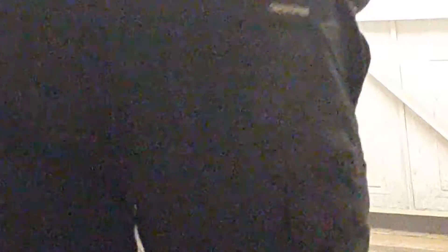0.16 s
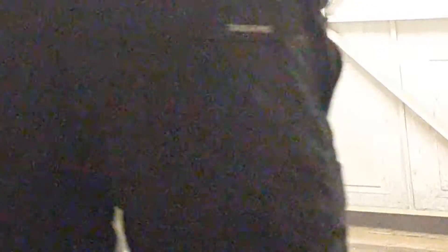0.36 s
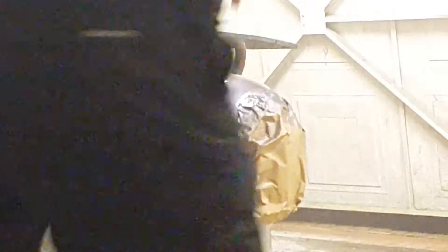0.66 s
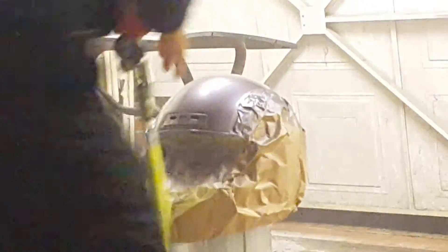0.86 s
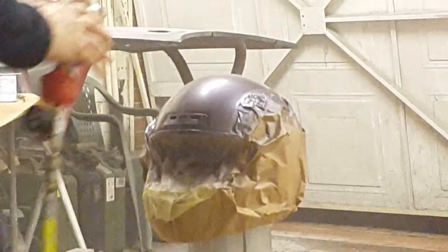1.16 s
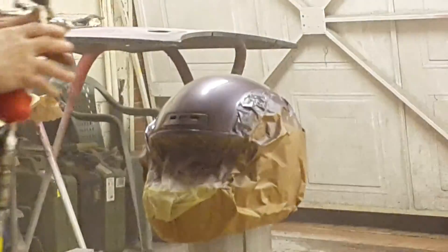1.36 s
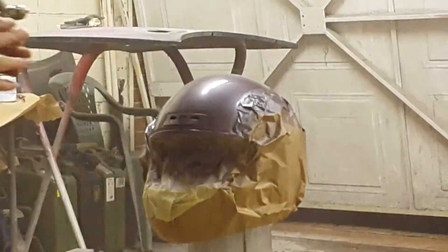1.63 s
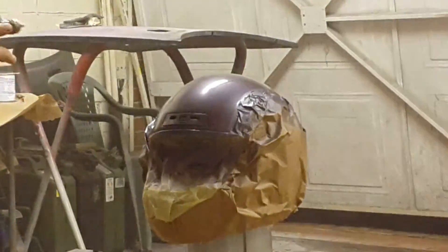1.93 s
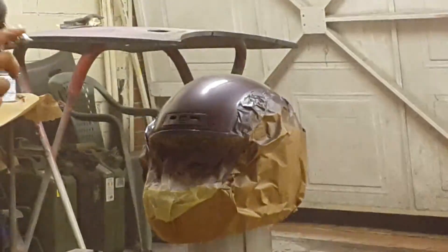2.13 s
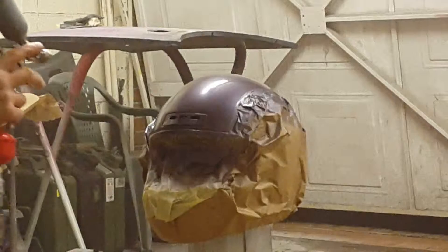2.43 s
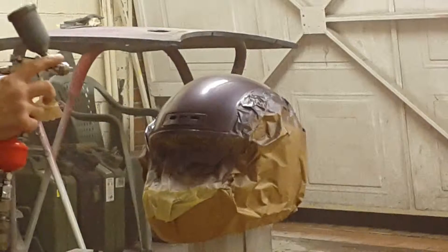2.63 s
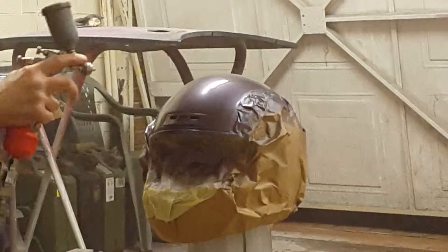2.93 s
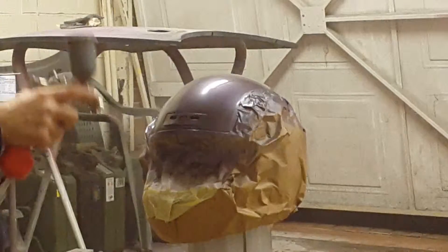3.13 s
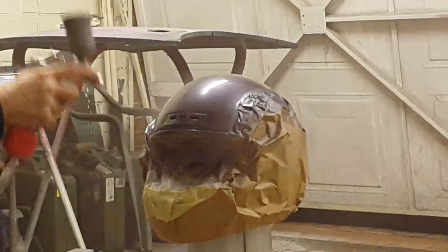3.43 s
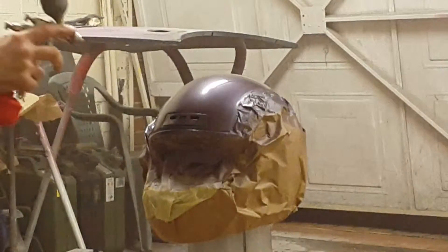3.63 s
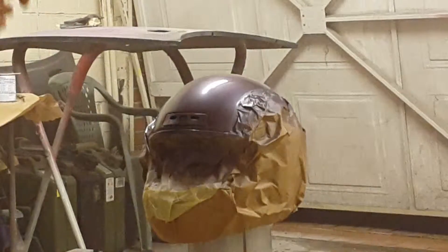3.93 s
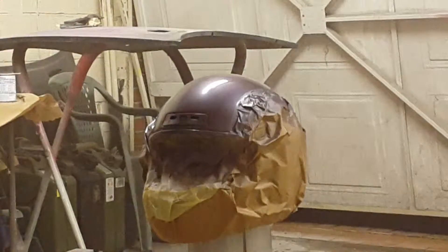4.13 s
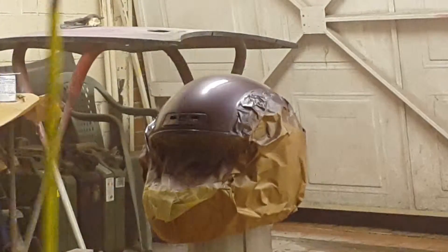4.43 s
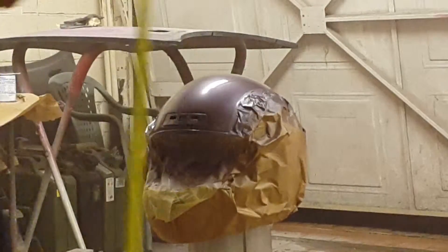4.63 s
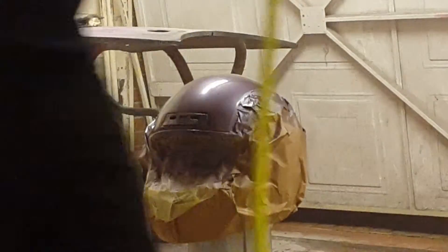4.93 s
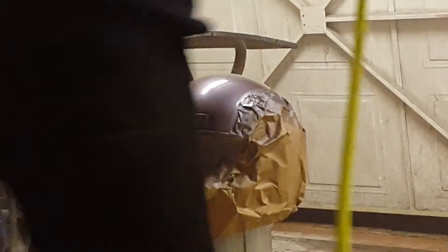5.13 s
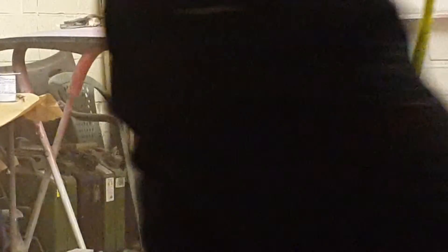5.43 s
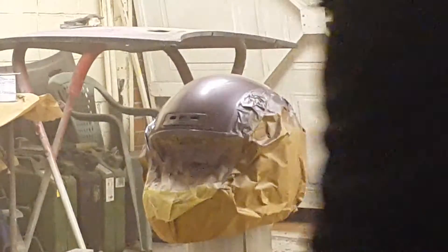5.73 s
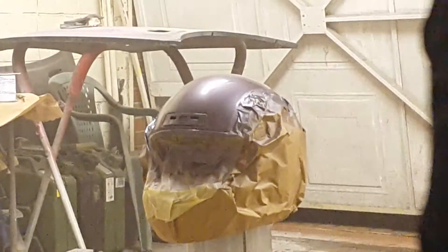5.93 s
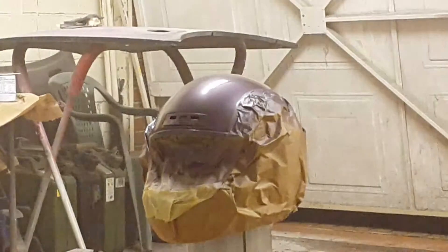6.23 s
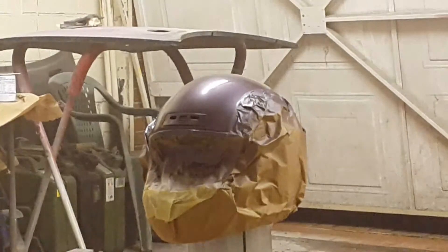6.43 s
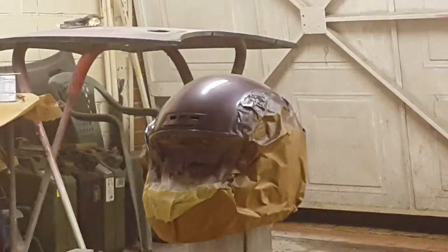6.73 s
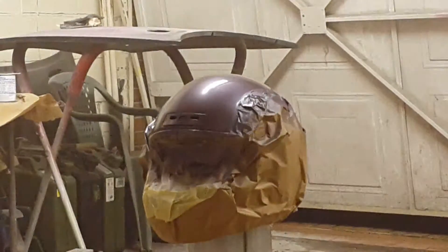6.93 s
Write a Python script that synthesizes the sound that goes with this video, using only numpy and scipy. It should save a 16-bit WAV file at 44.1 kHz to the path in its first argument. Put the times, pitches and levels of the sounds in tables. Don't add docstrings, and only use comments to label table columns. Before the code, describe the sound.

Loud, low mechanical throbbing with intake roar and valve clatter fills a hard garage, then drops away suddenly as the motor stops. A puff of venting air runs straight into two quick spray gun bursts. Afterward it is much quieter: piercing but small air whistles sag and flutter, breathy air seeps, soft knocks land, and a small fan motor and mains hum remain. Stereo camera microphone, near the work.

```python
import sys
import numpy as np
from scipy import signal
from scipy.fft import rfft, irfft
from scipy.io import wavfile
from scipy.ndimage import uniform_filter1d

SR = 44100
rng = np.random.default_rng(int(sys.argv[2]) if len(sys.argv) > 2 else 0)


def wav_out(sig):
    wavfile.write(sys.argv[1], SR, np.round(np.clip(np.atleast_2d(sig).T, -1, 1) * 32767).astype(np.int16))


def volts(x):
    e = np.asarray(x, float) / 20
    return 10 ** e


N = 311346

# t/s, level/dB
EFFORT = [(0.0, -11), (.19, -10), (.52, -11), (.545, -9), (.62, -11), (.9, -10), (1.13, -11), (1.38, -9.5),
          (1.5, -11.5), (1.75, -9.5), (2.2, -10), (2.5, -9), (2.62, -9), (2.716, -12)]
# t/s, share of full speed
RUN_DOWN = [
    (2.716, 1),
    (2.742, .69),
    (2.8, .655),
    (2.83, .56),
    (2.87, .45),
    (3.17, .22),
]
# multiple of the stroke rate, level/dB
STROKE = [(1, -34), (2, -29.5), (3, -10.5), (4, -4), (5, 0), (6, -8.5), (7, -13.5), (8, -10.5), (9, -23),
          (10, -6), (11, 0.5), (12, -1), (13, -34), (14, -16.5), (15, -13.5), (16, -8), (17, -23),
          (18, -20), (19, -18.5), (20, -19.5), (21, -20.5), (22, -59), (23, -22), (24, -31), (25, -23),
          (26, -35.5), (27, -22.5), (28, -20.5)]
# f/Hz, width/Hz, level/dB
CASING_RINGS = [(1581, 83, -31), (1740, 79, -27), (2000, 94, -34), (2139, 26, -31), (2685, 1300, -44)]
# f/Hz, level/dB (per Hz)
INTAKE = [(35, -72), (60, -47), (91, -23), (230, -9), (292, -8.5), (433, -3.5), (535, -10), (652, -7.5),
          (774, -11.5), (848, -14), (1400, -24), (1820, -58), (3080, -120)]
# f/Hz, level/dB (per Hz)
VALVES = [(760, -37), (1300, -2), (1360, -18), (1440, -8.5), (1740, -9.5), (1900, -9), (2200, -10.5),
          (2320, -13.5), (2830, -11.5), (4350, -20), (5660, -18.5), (9270, -27.5), (9660, -26.5),
          (11900, -32.5), (16000, -43)]

# multiple of the fan speed, level/dB
FAN = [(5, -17), (6, -10.5), (7, -0.5), (8, -18), (9, -6.5), (10, -11), (11, -4.5), (12, -6.5), (13, -2),
       (14, -14), (15, -6), (16, -4), (17, -5), (18, -8.5), (19, -9), (20, -22), (21, -24), (22, -21),
       (23, -24), (24, -12), (25, -14.5), (26, -30), (27, -32), (28, -26), (29, -27), (30, -17)]
# f/Hz, width/Hz, level/dB
FAN_RINGS = [(1150, 57, -13), (1287, 70, -11), (1970, 320, -19)]
# multiple of the hum pitch, level/dB
HUM = [(1, -43.5), (2, -53.5)]
# f/Hz, level/dB (per Hz)
RUMBLE = [(24, -54.5), (40, -32), (68, -17.5), (97, -6), (150, -9.5), (250, -6.5), (355, -5.5), (452, 0),
          (608, -7), (1000, -18), (1300, -40), (2200, -120)]
# f/Hz, level/dB (per Hz)
AIR = [(590, -36), (1000, -6), (1290, -5), (1650, -12), (2030, -8), (2250, -13), (3010, -19.5), (3380, -26),
       (4360, -29.5), (4840, -27), (8650, -33), (10300, -33.5), (12500, -30), (16000, -37)]

# start t/s, length t/s, first f/Hz, last f/Hz, top level/dB
PUFFS = [(1.86, .07, 15500, 13400, -48), (1.92, .08, 14300, 14700, -47.5), (3.82, .1, 14400, 15350, -31),
         (3.9, .1, 15250, 15000, -30), (3.93, .025, 13500, 14700, -31), (3.97, .02, 14460, 13200, -30),
         (5.12, 0.14, 14140, 14620, -24.5), (5.25, 0.098, 14360, 14200, -31), (6.7, .22, 13400, 12900, -70),
         (6.988, .022, 10800, 10500, -52), (6.995, .025, 10400, 8200, -61), (7.015, .06, 10900, 10700, -60),
         (7.03, .05, 5400, 5400, -61)]
# start t/s, length t/s, first f/Hz, last f/Hz, top level/dB
GASPS = [
    (1.24, .16, 15200, 14600, -47),
    (2.54, .2, 15500, 14700, -54),
    (6.27, .13, 14800, 14300, -48),
    (6.36, .24, 13400, 13400, -57),
]
# start t/s, length t/s, first f/Hz, last f/Hz, top level/dB
RUSTLE = (6.97, 0.5, 13500, 13500, -55)

# t/s, level/dB
VENT = [
    (2.676, -29),
    (2.688, -23.5),
    (2.786, -17.5),
    (2.96, -19.5),
    (3.06, -23),
    (3.158, -29.5),
    (3.18, -38),
]
# f/Hz, level/dB (per Hz)
VENT_TONE = [(410, -22), (700, -6.5), (1140, -5.5), (1460, -14.5), (1640, -9), (2240, -8.5), (2880, -1),
             (3740, -6.5), (4430, -4.5), (5500, -3.5), (7200, -4.5), (9350, -8.5), (12000, -8),
             (16000, -15)]

# start t/s, held t/s, flow level/dB, draught build t/s, buffeting level/dB
PULLS = [
    (3.168, 0.18, -25, 0.11, -25),
    (3.459, 0.17, -25.5, 0.017, -25),
]
# f/Hz, level/dB (per Hz)
JET = [(590, -45), (1000, -7.5), (1200, -17), (1430, -12.5), (2080, -8.5), (2550, -8), (3050, -1.5),
       (3500, -7), (4200, -7), (7440, -3.5), (8750, -5), (15100, 0.5), (16000, -20.5)]
# f/Hz, width/Hz, level/dB
BUFFET = [(308, 160, -2), (395, 54, -7.5), (609, 200, -2.5), (817, 240, -10.5), (1234, 200, -12)]

# t/s, f/Hz
LEAK = [
    [(3.38, 15234), (3.634, 14888), (3.7, 14820), (3.8, 14745), (3.902, 15260), (3.93, 15167)],
    [(3.945, 14770), (4.043, 14764), (4.167, 14514), (4.443, 14465), (4.643, 14668), (4.85, 14440),
     (5.05, 14170), (5.14, 14105)],
    [(5.295, 13800), (5.437, 14116), (5.503, 14015), (5.865, 13845), (5.99, 13850)],
    [(5.94, 14615), (6.114, 14828), (6.232, 14366), (6.326, 14685), (6.362, 13762), (6.424, 13075),
     (6.53, 13246)],
]
# first level/dB, slope in dB per s
LEAK_DB = [
    (-33.5, 8),
    (-26, -0.4),
    (-32.5, -19.5),
    (-42, -21),
]
# t/s, half length t/s, level/dB
SURGES = [(3.4, .08, -4), (3.627, .04, 5), (3.68, .02, -6), (3.736, 0.027, 6), (3.99, .016, -7),
          (4.034, .004, -8), (4.062, .014, 5), (4.088, .008, -5), (4.114, .008, 3), (4.17, .005, -4),
          (4.226, .008, -9), (4.258, .025, 5), (4.29, .01, 4), (4.325, .01, 10), (4.36, .022, -9),
          (4.41, 0.012, -15), (4.495, 0.0037, -8), (4.56, 0.025, 6), (4.585, .01, 4), (4.602, .006, -9),
          (4.618, .005, -8), (4.703, .005, -2), (4.774, 0.0072, -14), (4.83, .006, -6), (4.848, .008, 4),
          (4.87, .008, -11), (4.938, .006, 1), (4.96, .005, -11), (5.101, .01, -7), (5.12, .008, 2),
          (5.885, 0.014, 8), (6.23, 0.047, 7), (6.355, .025, -12), (6.43, 0.036, 5)]

# t/s, lowest cavity tone f/Hz, flow level/dB
SEEP = [
    (3.8, 4880, -48),
    (3.92, 5090, -53),
    (4.2, 4870, -50.5),
    (4.64, 4930, -51),
    (4.76, 5080, -47.5),
    (5.04, 4970, -44.5),
    (5.14, 4960, -41),
    (5.28, 4860, -61.5),
    (5.36, 4870, -72),
]

# t/s, peak level/dB, left-right level/dB
KNOCKS = [
    (4.189, -42, -3),
    (4.9252, -37.5, -1),
    (5.56, -52, 1.5),
    (5.7294, -47, 1.5),
    (5.7616, -33, -3),
    (5.766, -34, -2),
    (6.282, -46, 0.5),
    (6.5294, -50, 4),
]
# f/Hz, level/dB, t60 t/s
KNOCK = [(550, 6, .08), (906, 5, 0.17), (1970, 9, 0.07), (2910, 4.5, 0.033), (4870, -13, 0.029)]

# t/s, f/Hz
THIN_HIGH = [(5.23, 11760), (5.304, 11290), (5.358, 10060), (5.472, 9668), (5.784, 9637), (5.98, 10060),
             (6.128, 12390), (6.22, 12540)]
# t/s, f/Hz
THIN_MID = [(5.23, 7571), (5.472, 8022), (5.774, 8184), (5.936, 7667), (6.33, 7400)]
# first level/dB, slope in dB per s, swell t/s, swell level/dB
THIN_DB = [
    (-61, -7, 5.78, 5),
    (-69, 0.5, 5.75, 4),
]
# start t/s, length t/s, first f/Hz, last f/Hz, top level/dB
GLIDES = [(5.4, .48, 3970, 4090, -71), (6.69, 0.2, 4540, 4220, -63), (6.82, .19, 4220, 4380, -61),
          (6.74, .24, 4250, 4500, -63), (5.9, .4, 9600, 9350, -73), (6.7, .13, 9034, 8900, -67),
          (6.75, .17, 8650, 8500, -73), (6.98, .09, 8150, 8000, -65)]

# f/Hz, level/dB
SIDE_FAR = [(60, -29.5), (130, -51), (290, -23.5), (640, -19.5), (1410, -4), (3100, -9.5), (6820, -7.5),
            (15000, -10)]
# f/Hz, level/dB
SIDE_NEAR = [(60, 0), (130, -9), (290, -28.5), (640, -15), (1410, -4.5), (3100, -14), (6820, -6.5),
             (15000, -10.5)]
# f/Hz, level/dB
LEAN_FAR = [(60, -0.51), (180, 0.16), (550, -0.047), (1650, -0.9), (4970, 0.46), (15000, 1.0)]
# f/Hz, level/dB
LEAN_NEAR = [(60, 0.0), (180, 9), (550, -5), (1650, 0.019), (4970, 0), (15000, 3.5)]

STROKE_HZ, FAN_HZ, HUM_HZ, TOP_HZ = 48.7, 36.15, 99.9, 15950
STOP_S = 3.17
CLATTER_DB, COAST_CLATTER_DB = -27, 10.5
COAST_HOLD_S, COAST_DB_PER_S = 0.084, -120
LINGER_DB, LINGER_DB_PER_S = -5.5, -130
CHOKE_TURN, CHOKE_DEPTH, CHOKE_TURNS = .46, 0.54, 0.17
FAN_DB, RUMBLE_DB, AIR_DB = -35.5, -36.5, -48
DUCK_DB, DUCK_ENDS_S, DUCK_OPENS_S = -8.5, 2.75, 0.29
PUFF_HZ, GASP_HZ, RUSTLE_HZ = 300, 900, 4000
GLIDE_ENDS_DB, PUFF_ENDS_DB = -3, -8
VENT_TREBLE_DB, VENT_DULL_DB_PER_S2 = -3.5, -10
PULL_S, TAIL_S = 0.0091, .49
RELEASE_DB_PER_S, RELEASE_FLOOR_S = -125, 0.11
DULL_SHARE, SPIT_DB, SPIT_S = 0.49, 2.5, 0.034
LAG_DB, BUFFET_DB_PER_S, BUFFET_HOLD_S = -9, -110, 0.084
SEEP_REST_DB, SPREAD, SPREAD_PER_DB = -47, 0.39, 0.5
SEEP_MID_DB, SEEP_MID_SHARE = -47, 0.3
SEEP_MID_FROM_S, SEEP_MID_RISE_S = 3.82, 0.3
SEEP_HIGH_DB, SEEP_HIGH_SHARE, SEEP_HIGH_RATIO = -52.5, 0.22, .664


def evened(x):
    return x / np.sqrt(np.mean(abs(x) ** 2) + 1e-20)


def read(points, hz):
    f, value = np.transpose(points)
    return np.interp(np.log(hz + 1), np.log(f + 1), value)


def played(rows):
    s, *columns = np.transpose(rows)
    t = np.arange(max(s[0], 0), s[-1], 1 / SR)
    return [t] + [np.interp(t, s, c) for c in columns]


def swell(start, length, first_hz, last_hz, db, ends_db):
    t = np.arange(start, min(start + length, N / SR), 1 / SR)
    u = (t - start) / length
    return t, first_hz + (last_hz - first_hz) * u, db + ends_db * (1 - np.sin(np.pi * u ** 0.55))


def add(mix, t, sound, fade_s=.004, end_s=0.0077):
    part = mix[:, round(t[0] * SR):][:, :len(t)]
    rise = (t - t[0] + (t[0] < .01)) / fade_s
    fall = (t[-1] - t + (t[-1] > 7.05)) / end_s
    soft = np.clip(np.minimum(rise, fall), 0, 1)
    part += (sound * soft)[:, :part.shape[1]]


def drift(count, hz, size):
    z = rng.standard_normal((count, size // 32 + 400, 2)) @ [1, 1j]
    r = np.exp(-2 * np.pi * hz * 32 / SR)
    z = signal.lfilter([1], [1, -r], signal.lfilter([1], [1, -r], z))[:, 398:]
    return evened(signal.resample_poly(z, 32, 1, axis=1)[:, :size])


def ports(x, side, lean):
    hz = np.fft.rfftfreq(x.shape[1], 1 / SR)
    mid, rim = rfft(x[0]), rfft(x[1]) * volts(read(side, hz))
    left_right = np.array([mid + rim, mid - rim])
    return irfft(left_right * volts(read(lean, hz) / [[2], [-2]]), x.shape[1])


def hiss(tone, size, patchy_db, band_hz, side=SIDE_NEAR, lean=LEAN_NEAR):
    hz = np.fft.rfftfreq(512, 1 / SR)
    a, b, c, d, patch = rng.standard_normal((size // 128 + 6, 257, 5)).T
    patch = evened(uniform_filter1d(uniform_filter1d(patch, 6, 0), 20, 1))
    gain = volts(read(tone, hz))
    inside = (hz > band_hz[0]) & (hz < band_hz[1])
    share = np.sqrt(np.sum(gain[inside] ** 2) / np.sum(gain ** 2))
    spectrum = np.array([a + 1j * b, c + 1j * d]) * (gain[:, None] * volts(patchy_db * patch))
    x = signal.istft(spectrum, nperseg=512, noverlap=384)[1]
    return ports(evened(x[:, :size]), side, lean) / share


def long_hiss(tone, size):
    z = rfft(rng.standard_normal((2, size))) * volts(read(tone, np.fft.rfftfreq(size, 1 / SR)))
    return ports(evened(irfft(z, size)), SIDE_FAR, LEAN_FAR)


def treble(x, db, edge_hz=8500):
    high = signal.sosfiltfilt(signal.butter(2, edge_hz, "high", fs=SR, output="sos"), x)
    return x + (volts(db) - 1) * high


def whistle(t, hz, db, width_hz, unsteady, apart=0.73, pan_db=3.0):
    a, b, c = drift(3, width_hz, len(t))
    flutter = (1 - unsteady) + unsteady * np.array([a + apart * b, a + apart * c])
    tone = (flutter * np.exp(2j * np.pi * np.cumsum(hz) / SR)).real
    return volts(db) * evened(tone) * volts(pan_db * np.array([[.5], [-.5]]))


def band(t, hz, db, width_hz, order=3):
    turn = np.exp(2j * np.pi * np.cumsum(hz + 0 * t) / SR)
    a, b = rng.standard_normal((2, len(t) + 800, 2)) @ [1, 1j]
    lowpass = signal.butter(order, np.mean(width_hz) / 2, fs=SR, output="sos")
    low = signal.sosfilt(lowpass, [a + 0.64 * b, a - 0.12 * b])
    return volts(db) * evened((low[:, 800:] * turn).real)


def rotor(hz, orders, rings, count, wander, wander_hz, carried, scatter, bass_hz=260, ragged=2.1):
    k, db = np.transpose(orders)
    turns = np.cumsum(hz) / SR + .84
    slow = drift(2 * count, wander_hz, len(hz[::8]))
    rough = ragged * (1 - hz[::8] / hz[0]) * drift(2 * count, 16.0, len(hz[::8]))
    grid = np.arange(0, count + 1, .1)
    ringing = sum(volts(level) / (1 + (2 * (grid * hz[0] - f) / width) ** 2) for f, width, level in rings)
    casing = np.interp(grid, k, volts(db), left=0, right=0) + ringing * (grid > k[-1])
    out = np.zeros((2, len(hz)))
    for n in range(1, count + 1):
        own = casing[10 * n]
        radiated = (1 + (bass_hz / (n * hz[0])) ** 4) / (1 + (bass_hz / (n * hz)) ** 4)
        level = carried * radiated * own + (1 - carried) * np.interp(n * hz / hz[0], grid, casing)
        weak = min(wander * (casing.max() / (own + 1e-6)) ** (2 / 5), 1)
        pair = slice(2 * n - 2, 2 * n)
        waver = [[1], [0]] + [[weak], [1]] * slow[pair] + rough[pair]
        smear = n ** 2 * 3 / 14
        spin = np.exp(2j * np.pi * (n * turns + smear + scatter * n ** 2 * rng.random()))
        out += level * (np.repeat(waver, 8, axis=1)[:, :len(hz)] * spin).real
    return ports(out / np.std(out[:, :2 * SR], axis=1, keepdims=True), SIDE_FAR, LEAN_FAR), turns


def compressor(mix):
    t = np.arange(0, STOP_S, 1 / SR)
    off = np.maximum(t - EFFORT[-1][0], 0)
    speed = uniform_filter1d(np.interp(t, *np.transpose(RUN_DOWN)), 300)
    effort_db = np.interp(t, *np.transpose(EFFORT)) + COAST_DB_PER_S * np.maximum(off - COAST_HOLD_S, 0)
    clatter_db = effort_db + CLATTER_DB + COAST_CLATTER_DB * (1 - speed) * 2
    drone, turns = rotor(STROKE_HZ * speed, STROKE, CASING_RINGS, count=70, wander=.15, wander_hz=5.5,
                         carried=.75, scatter=.0005)
    choke = uniform_filter1d(CHOKE_DEPTH * np.exp(-((turns - CHOKE_TURN) % 1) / CHOKE_TURNS), 40)
    above_bass = signal.butter(4, 135, "high", fs=SR, output="sos")
    drone = drone - signal.sosfiltfilt(above_bass, drone * (choke - choke.mean()))
    beat = evened(1 + 0.096 * np.cos(2 * np.pi * turns - 1.6) + 0.057 * drift(1, 14, len(t))[0].real)
    roar = volts(-12.5) * long_hiss(INTAKE, len(t)) * evened(1 - choke)
    roar = roar / np.clip(speed, .4, 1) ** 1.87
    earlier = np.roll(drone, round(24 * SR / STROKE_HZ), axis=1)
    drone = drone + earlier * np.minimum(off / .02, 1) * volts(LINGER_DB + LINGER_DB_PER_S * off)
    clatter = long_hiss(VALVES, len(t)) * beat
    add(mix, t, volts(effort_db + 0.17) * (drone + roar) + volts(clatter_db + 3.0) * clatter)


def garage():
    t = np.arange(N) / SR
    fan = rotor(FAN_HZ + np.zeros(N), FAN, FAN_RINGS, count=60, wander=0.4, wander_hz=5.2,
                carried=1, scatter=.01)[0]
    hum_turns = HUM_HZ * np.arange(N) / SR + 0.49
    hum = sum(np.sqrt(2) * volts(db) * np.sin(2 * np.pi * k * hum_turns) for k, db in HUM)
    rumble = volts(RUMBLE_DB - 3.5) * long_hiss(RUMBLE, N)
    air = rumble + volts(AIR_DB - 2.0) * hiss(AIR, N, 1.6, (1000, 12000), SIDE_FAR, LEAN_FAR)
    grain = evened(1 + 0.17 * np.cos(2 * np.pi * FAN_HZ * t) + 0.16 * drift(1, 70, N).real)
    duck_db = DUCK_DB * np.clip(1 - (t - DUCK_ENDS_S) / DUCK_OPENS_S, 0, 1)
    return volts(duck_db) * (volts(FAN_DB - 7.5) * fan + hum + air * grain)


def breaths(mix):
    for rows, width_hz in [(PUFFS, PUFF_HZ), (GASPS, GASP_HZ), ([RUSTLE], RUSTLE_HZ)]:
        for row in rows:
            t, hz, db = swell(*row, PUFF_ENDS_DB)
            add(mix, t, band(t, hz, db, width_hz), fade_s=0.011)


def vent(mix):
    t, flow_db = played(VENT)
    jet = hiss(VENT_TONE, len(t), 1.05, (2000, 8000))
    jet = treble(jet, VENT_TREBLE_DB + VENT_DULL_DB_PER_S2 * (t - t[0]) ** 2)
    add(mix, t, volts(flow_db) * jet, fade_s=0.0059)


def gun(mix):
    for start, held, flow_db, build_s, buffet_db in PULLS:
        u = np.arange(0, TAIL_S, 1 / SR)
        t, gone = start + u, np.maximum(u - held, 0)
        late = np.maximum(gone - RELEASE_FLOOR_S, 0)
        fall_db = RELEASE_DB_PER_S * (np.minimum(gone, RELEASE_FLOOR_S) + 0.7 * late)
        first_spit = np.exp(-u / SPIT_S) * build_s / 0.087
        late_spit = np.minimum(u / held, 1) ** 2 * (1 - build_s / .1)
        spit_db = SPIT_DB * (first_spit + late_spit)
        jet = treble(hiss(JET, len(t), 1.4, (2000, 8000)), spit_db + DULL_SHARE * fall_db - 2.5)
        draught = sum(band(t, hz, db, width) for hz, width, db in BUFFET)
        draught = evened(0.46 * draught[0] + 0.2 * draught)
        gust_db = buffet_db + LAG_DB * np.maximum(1 - u / build_s, 0)
        gust_db = gust_db + BUFFET_DB_PER_S * np.maximum(u - build_s - BUFFET_HOLD_S, 0)
        add(mix, t, volts(flow_db + fall_db) * jet + volts(gust_db) * draught, fade_s=PULL_S, end_s=0.066)


def leaks(mix):
    for rows, (first_db, slope) in zip(LEAK, LEAK_DB):
        t, hz = played(rows)
        surge_db = sum(d * np.exp(-((t - s) / w) ** 2) for s, w, d in SURGES)
        db = first_db + slope * (t - t[0]) + surge_db
        skirt = band(t, hz, uniform_filter1d(db, 4000) - 19, 1200)
        shaky_hz = hz + 25 * drift(1, 30, len(t))[0].real
        add(mix, t, whistle(t, shaky_hz, db + 1.0, 50, 0.38, pan_db=2.5) + skirt, fade_s=0.0038)


def seep(mix):
    t, hz, flow_db = played(SEEP)
    extra_db = flow_db - SEEP_REST_DB
    spread = SPREAD + SPREAD_PER_DB * np.maximum(extra_db, 0)
    spread = np.clip(uniform_filter1d(spread, 6000), 0, .6)
    asleep = np.clip(1 - (t - SEEP_MID_FROM_S) / SEEP_MID_RISE_S, 0, 1)
    mid_db = SEEP_MID_DB + np.minimum(SEEP_MID_SHARE * extra_db, 1.2 * extra_db + 3) - 16 * asleep
    high_db = SEEP_HIGH_DB + np.minimum(SEEP_HIGH_SHARE * extra_db, 1.0 * extra_db + 5)
    leak_hz = np.interp(t, *np.transpose(LEAK[0] + LEAK[1]))
    high_hz = SEEP_HIGH_RATIO * uniform_filter1d(leak_hz, 4000)
    tones = [(hz, flow_db - 1.2, 220, 1.1, 1800),
             (1.467 * hz, mid_db, 750, 1.6, 2700),
             (high_hz, high_db, 220, 1.93, 1800)]
    for tone_hz, db, tight_hz, drag, wide_hz in tones:
        gusts_db = 2.5 * drift(2, 6.5, len(t)).real
        tight = band(t, tone_hz, db + gusts_db[0], tight_hz)
        smeared = band(t, drag * hz, db + .5 * gusts_db[1], wide_hz, order=2)
        add(mix, t, (1 - spread) * tight + spread * smeared, fade_s=0.036)
    fizz = band(t, 11600, uniform_filter1d(high_db, 9000) - 8.5, 2200)
    add(mix, t, fizz, fade_s=.1)


def knocks(mix):
    t = np.arange(9000) / SR
    for s, db, pan_db in KNOCKS:
        ring = band(t, 1600, 12, 2600) * volts(-60 * t / 0.013)
        for hz, level, t60 in KNOCK:
            decay = volts(-60 * t / t60) + volts(-12.0 - 60 * t / 0.7)
            ring = ring + band(t, hz, level, 530) * decay
        add(mix, s + t, volts(db - 16.5) * ring * volts(pan_db * np.array([[.5], [-.5]])), fade_s=.0006)


def faint_whistles(mix):
    faint = [swell(*row, GLIDE_ENDS_DB) for row in GLIDES]
    for rows, (first_db, slope, s, swell_db) in zip([THIN_HIGH, THIN_MID], THIN_DB):
        t, hz = played(rows)
        db = first_db + slope * (t - t[0]) + swell_db * np.exp(-((t - s) / .12) ** 2)
        faint.append((t, hz, db))
    for t, hz, db in faint:
        add(mix, t, whistle(t, hz, db + .5, 40, .75) + band(t, hz * .99, db - 5, 300), fade_s=.02)


def scene():
    mix = garage()
    for source in (compressor, breaths, vent, gun, leaks, seep, knocks, faint_whistles):
        source(mix)
    return mix


def roll_off(x):
    return signal.sosfilt(signal.butter(12, 16560, fs=SR, output="sos"), x)


def record(dry):
    knee = 0.94
    over = np.maximum(abs(dry) - knee, 0)
    clipped = dry - np.sign(dry) * (over - (1 - knee) * np.tanh(over / (1 - knee)))
    lowpass = signal.firwin(301, TOP_HZ, window=("kaiser", 7), fs=SR)
    limited = signal.oaconvolve(clipped, lowpass[None], "same")
    return roll_off(limited)


dry = scene()
out = record(dry)
wav_out(out)
```